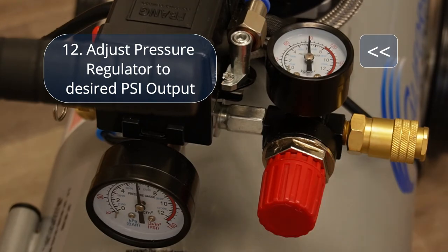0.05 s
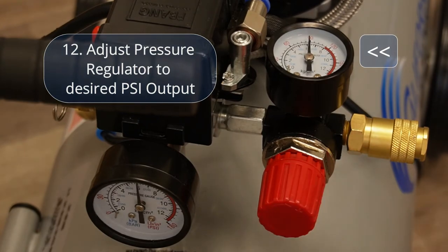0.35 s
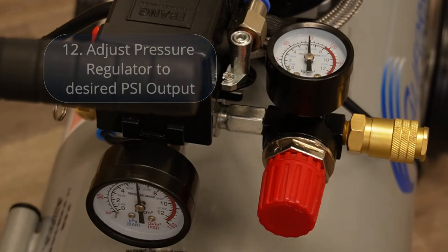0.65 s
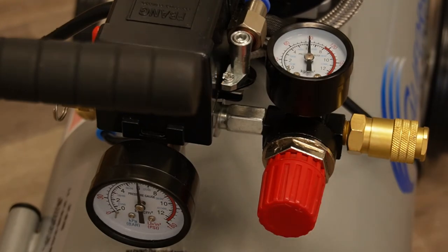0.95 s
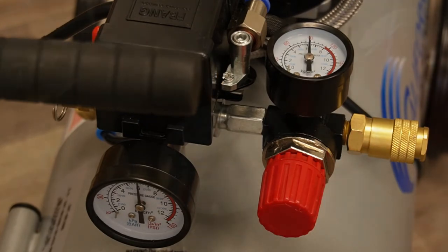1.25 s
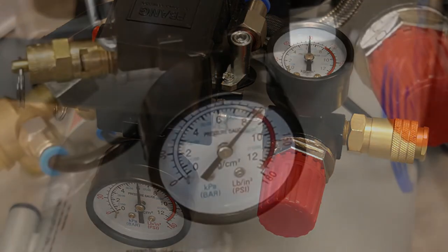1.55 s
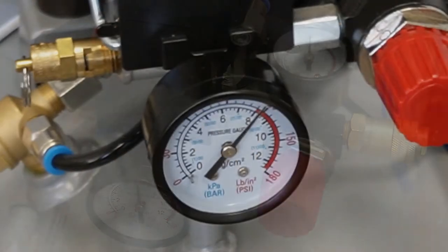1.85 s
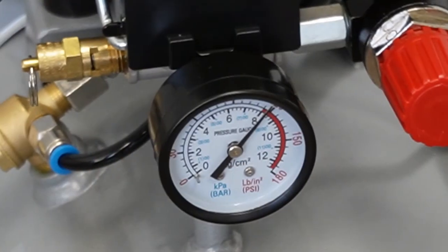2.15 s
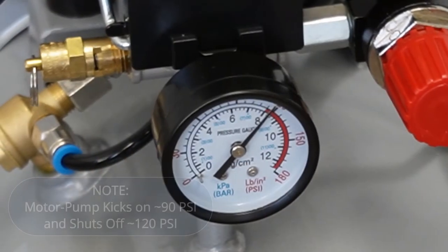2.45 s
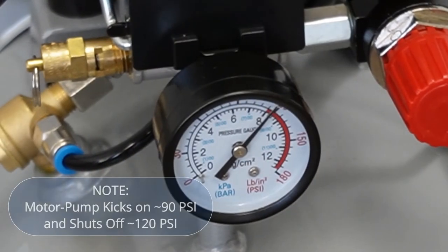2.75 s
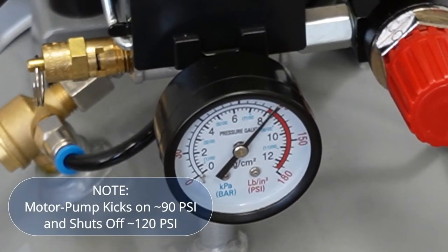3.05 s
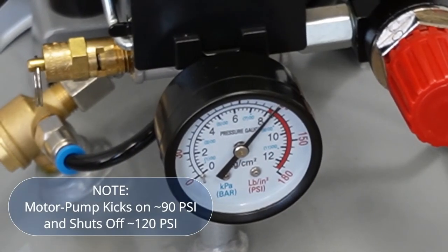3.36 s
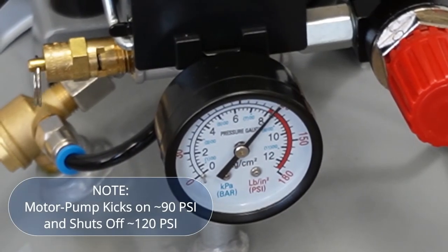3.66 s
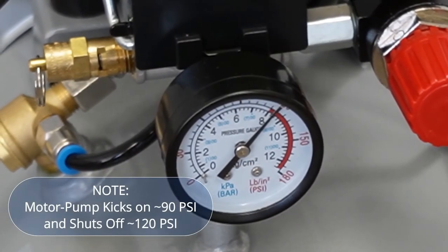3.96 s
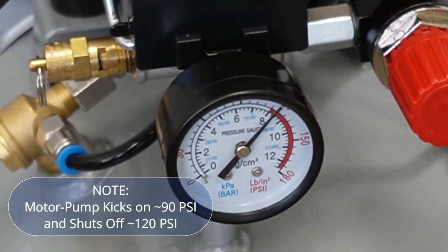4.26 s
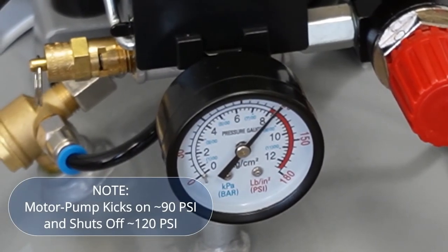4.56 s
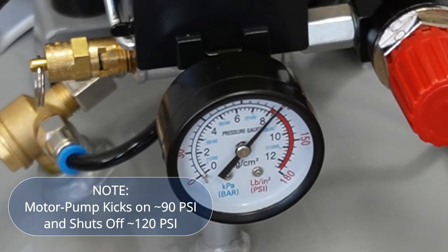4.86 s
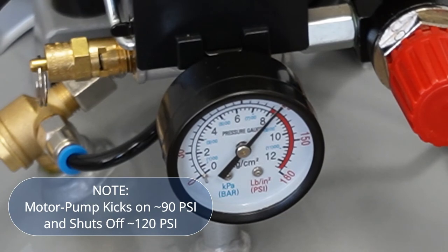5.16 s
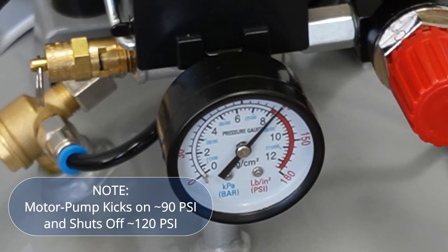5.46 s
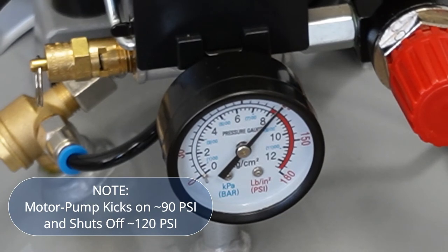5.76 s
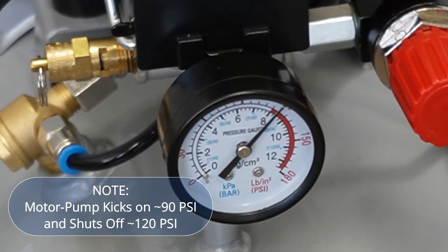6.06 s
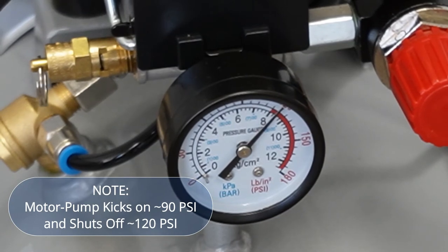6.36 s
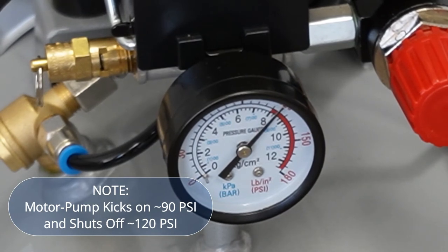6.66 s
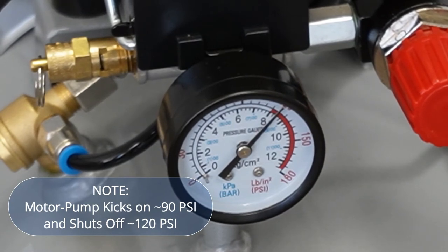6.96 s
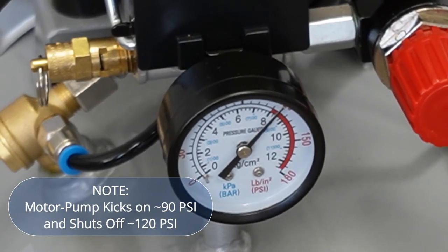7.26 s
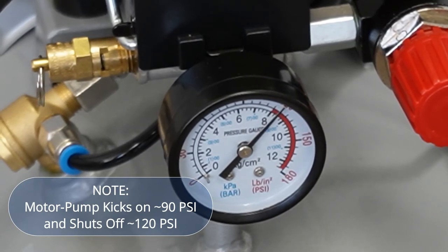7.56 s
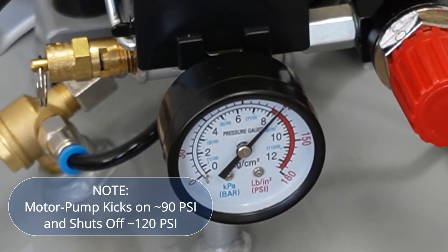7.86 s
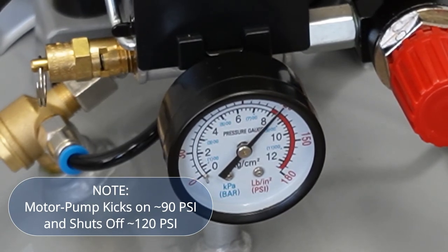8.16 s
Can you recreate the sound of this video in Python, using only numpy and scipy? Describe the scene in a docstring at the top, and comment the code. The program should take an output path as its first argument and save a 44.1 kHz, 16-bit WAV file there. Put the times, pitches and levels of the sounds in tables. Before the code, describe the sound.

A small piston air compressor is already running at the start, heard from close above the pump in a workshop. Fast, even puffs of intake air blend into a fluttering rush over a low hum, with rapid metallic valve ticks and a light rattle. At about 1.6 seconds the sound changes suddenly as the microphone moves beside the gauge: the air noise is softer, and the tank's throbbing, buzzy hum leads, with the ticking still running through it. The speed stays constant. At about 7.4 seconds a switch snaps and the pumping stops abruptly. At the same instant a valve opens with a short spurt, followed by a bright, high, steady hiss of escaping air. The hiss lasts until the end, at about 8 seconds, with only a very faint drone from the coasting motor and quiet room tone beneath it.

```python
"""A small twin-piston air compressor fills its tank in a workshop. The microphone starts close above
the pump: twice a shaft turn the intake draws a puff of air, while reed valves tick and the tank hums.
At 1.6 s the position changes to beside the gauge, where the air is shielded and the hum leads.
At 7.4 s the pressure switch trips, the pumping stops and the unloader valve lets the line's air out
in a bright hiss. Under it the coasting motor leaves a faint drone in the quiet room."""
import sys
import numpy as np
from scipy import signal
from scipy.fft import rfft, irfft, next_fast_len
from scipy.io import wavfile
from scipy.ndimage import map_coordinates

SR = 44100
rng = np.random.default_rng(int(sys.argv[2]) if len(sys.argv) > 2 else 0)


def wav_record(signal):
    """Record a signal, one row per channel, as 16-bit PCM in the file named by sys.argv[1]."""
    frames = np.transpose(np.atleast_2d(signal))
    bounded = np.clip(frames, -1, 1)
    # unit amplitude maps onto the largest positive 16-bit level
    quanta = np.round(bounded * 32767).astype(np.int16)
    wavfile.write(sys.argv[1], SR, quanta)


N = 362392

MOVE_S, TRIP_S = 1.603, 7.3845  # the microphone changes place; the switch trips
ABOVE_SHAFT_HZ, BESIDE_SHAFT_HZ = 28.19, 27.6
FIRST_STROKE_TURNS = .46
CANCEL_BELOW_HZ = 224.9  # below this the two pistons cancel each other's odd harmonics

# Broad response of pump frame and tank. Each row: frequency in Hz, relative level in dB.
ABOVE_TANK = [(55, 2), (170, -3.5), (350, -9), (440, -13), (560, -6.5), (640, -4.5), (690, -13.5),
              (1150, -9), (1220, -24)]
BESIDE_TANK = [(55, -10.5), (440, -14), (560, -14.5), (610, -8.5), (660, -5), (720, -10.5), (850, -14.5),
               (885, -4), (950, 2.5), (995, -3.5), (1020, -16), (1220, -18), (1300, -25), (1500, -20),
               (1600, -24)]
# Narrow resonances (+) and nodes (-). Each row: multiple of the shaft speed, lift in dB.
ABOVE_LIFTS = [(9, 3), (12, 4), (21, 8), (25, 8.5), (31, 12.5), (34, 7), (35, 10), (40, 12)]
BESIDE_LIFTS = [(4, 9), (6, 9), (10, -16), (12, 4), (17, 5), (19, 5), (25, 6), (29, -10), (39, 16), (40, 9),
                (42, 14), (44, 9), (52, 9), (54, 9)]
# Intake and cooling air. Each row: frequency in Hz, level in dB per Hz.
ABOVE_INTAKE = [(25, -100), (80, -100), (130, -82.5), (350, -91), (600, -84), (1050, -93.5), (1300, -90.5),
                (1600, -83.5), (3000, -82.5), (4500, -80.5), (7000, -82.5), (9000, -85), (13000, -84),
                (15800, -89.5)]
BESIDE_INTAKE = [(25, -106), (80, -104), (130, -93), (250, -103), (500, -100), (650, -91.5), (950, -91),
                 (1300, -99), (2400, -96), (4500, -91.5), (6500, -96), (10000, -98.5), (13500, -99),
                 (15800, -103)]
# Modes of cylinder head and housing. Each row: frequency in Hz, width in Hz, peak in dB per Hz.
ABOVE_HEAD_MODES = [(982, 36, -76.5), (1094, 15, -81), (1452, 9, -73), (1570, 40, -81), (1747, 35, -79.5),
                    (3570, 28, -75.5), (3663, 35, -73), (3816, 26, -72.5)]
BESIDE_HEAD_MODES = [(1490, 110, -93), (2040, 90, -93), (2394, 140, -92), (3556, 135, -84.7),
                     (5080, 300, -89.5), (10800, 91, -100)]
# Valve closings. Each row: place in the turn from 0 to 1, relative level in dB, scatter in turns.
ABOVE_SLAPS = [(.44, -0.5, 0.024), (.53, -8, 0.043), (.96, -6, 0.093)]
BESIDE_SLAPS = [(.02, 6, 0.018), (.345, 9, 0.0014), (.455, -4, .0012), (.545, 7, 0.0013), (.845, 8, .004),
                (.885, -14, .004)]
# Ring of the steel reeds. Each row: frequency in Hz, relative level in dB.
ABOVE_REED_RING = [(1500, -30), (4100, -21), (4520, 0), (4780, 0), (5200, -16), (8000, -22), (15800, -27)]
BESIDE_REED_RING = [(1500, -28), (4100, -19), (4550, -6), (4850, -1), (5130, 1), (5550, -16), (15800, -29)]
# Rattle of rods and bearings. Each row: frequency in Hz, level in dB per Hz.
ABOVE_RODS = [(1100, -120), (1500, -88.5), (2600, -87.5), (4200, -101), (7000, -105)]
BESIDE_RODS = [(1100, -120), (1380, -100), (1700, -97), (2050, -93), (2500, -98), (3000, -102),
               (7000, -110)]
# Motor tones from the mains and the rotor slots. Each row: frequency in Hz, level in dB.
ABOVE_MOTOR = [(120, -64.5), (175.5, -70.5), (346, -63), (965.5, -60.5), (1085, -65.5)]
BESIDE_MOTOR = [(120, -76.5), (175.5, -73)]
# Broad rush of the unloader's jet. Each row: frequency in Hz, relative level in dB.
JET_RUSH = [(300, -31), (1400, -20), (2000, -12.5), (2600, -7.5), (3300, -4), (4600, -3), (5600, -10),
            (8000, -8), (15800, -13.5)]
# Modes of the vent tube. Each row: frequency in Hz, width in Hz, relative level in dB.
VENT_MODES = [(8300, 720, -0.5), (10270, 750, -2.5), (12100, 800, -3), (13050, 500, -6), (13950, 600, -1.5),
              (15400, 650, 1.5)]
# Likeness of left and right at the microphone. Each row: frequency in Hz, coherence from 0 to 1.
ABOVE_COHERENCE = [(125, 1), (165, .7), (290, 0.65), (640, 0.66), (1100, 1), (3100, 0.92), (6820, .74),
                   (15000, 0.45)]
BESIDE_COHERENCE = [(60, 1.0), (130, 1.0), (290, 1), (640, 0.97), (1410, 0.96), (3100, 0.91), (6820, 0.72),
                    (15000, 0.52)]
VENT_COHERENCE = [(60, 0.84), (130, 1.0), (290, 0.89), (640, 0.97), (1410, 1), (3100, 1), (6820, 0.71),
                  (15000, 0.74)]
# Drone of the coasting machine. Each row: frequency in Hz, level in dB once it has swelled.
COAST_TONES = [(118.4, -81), (678.3, -82)]
# Room tone of the workshop. Each row: frequency in Hz, level in dB per Hz.
ROOM_TONE = [(25, -114), (60, -110), (120, -110), (330, -116), (500, -110), (680, -104), (900, -107),
             (1200, -107), (4000, -112), (15800, -120)]


def pump_above():
    """Close above the pump: loud intake air, one hard valve tick a turn and a low boom that soon fades."""
    turns = shaft(ABOVE_SHAFT_HZ)
    orders = shaft_orders(ABOVE_SHAFT_HZ, ABOVE_TANK, ABOVE_LIFTS, odd_db=-28, count=44)
    hum = amp(-62.5) * tank_hum(turns, orders, throb_db=4.5, flutter_db=1.1) + motor(ABOVE_MOTOR)
    air = intake(turns, ABOVE_INTAKE, ABOVE_HEAD_MODES, depth_db=1.9, uneven_db=.8, ring_depth_db=1.5)
    ticks = amp(-51.7) * valves(turns, ABOVE_SLAPS, ABOVE_REED_RING, t60=.028, scatter_db=2.8, repeat=.3)
    boom_modes = [(185, 31, -73.5), (423, 30, -75), (646, 7.2, -65.5)]
    boom = filtered(white(), lambda hz: resonances(boom_modes, hz)) * np.interp(clock(), [.2, .4], [1, 0])
    rods = rattle(turns, ABOVE_RODS, depth_db=-1.0)
    return stereo(hum + air + ticks + boom + rods, ABOVE_COHERENCE, left_db=0.9)


def pump_beside():
    """Beside the gauge: the tank's hum leads, and the pumping dies as soon as the load is off."""
    turns = shaft(BESIDE_SHAFT_HZ)
    orders = shaft_orders(BESIDE_SHAFT_HZ, BESIDE_TANK, BESIDE_LIFTS, odd_db=-18, count=57)
    hum = amp(-63) * tank_hum(turns, orders, throb_db=11, flutter_db=0.05) + motor(BESIDE_MOTOR)
    air = intake(turns, BESIDE_INTAKE, BESIDE_HEAD_MODES, depth_db=1.2, uneven_db=.7, ring_depth_db=5)
    ticks = valves(turns, BESIDE_SLAPS, BESIDE_REED_RING, t60=.023, scatter_db=1.6, repeat=1.1)
    rods = rattle(turns, BESIDE_RODS, depth_db=0.5)
    load = np.exp(-since_trip() / 0.018)
    return load * stereo(hum + air + amp(-59.8) * ticks + rods, BESIDE_COHERENCE, left_db=0.3)


def shaft(speed_hz, coast_s=0.48, waver=0.00044):
    """Turns made so far: the speed is nearly constant, then dies away after the switch trips."""
    speed = speed_hz * (1 + waver * wobble(6)) * np.exp(-since_trip() / coast_s)
    return np.cumsum(speed) / SR


def strokes(turns, depth_db):
    """Air flow swells twice a turn, once for each piston."""
    return unit(amp(depth_db * np.cos(4 * np.pi * (turns - FIRST_STROKE_TURNS))))


def shaft_orders(speed_hz, tank, lifts, odd_db, count):
    """Multiple and dB of each shaft harmonic: the tank colours them, low odd ones cancel, some ring."""
    multiple = np.arange(1, count + 1)
    hz = multiple * speed_hz
    cancelled = odd_db * (multiple % 2) * np.maximum(1 - hz / CANCEL_BELOW_HZ, 0)
    lift = sum(db * (multiple == round(k)) for k, db in lifts)
    return np.column_stack([multiple, along(tank, hz) + cancelled + lift])


def tank_hum(turns, orders, throb_db, flutter_db):
    """The frame drones evenly on the low orders; two regions of the tank wall buzz with each stroke."""
    frame, low_wall, high_wall = np.split(orders, [19, 29])
    parts = (frame, 0), (low_wall, throb_db / 2), (high_wall, throb_db)
    hum = sum(harmonics(turns, part, depth_db) for part, depth_db in parts)
    return hum * amp(flutter_db * wobble(25))


def harmonics(turns, orders, throb_db, size=1024, passes=40):
    """Shaft harmonics whose energy is shared evenly between the two strokes."""
    multiple, db = np.transpose(orders)
    strength = np.zeros(size // 2 + 1)
    strength[np.round(multiple).astype(int)] = amp(db) * size / np.sqrt(2)
    cycle = rng.standard_normal((2, size))
    swell = strokes(np.arange(size) / size, throb_db)
    for _ in range(passes):  # shift the phases until the wave swells with the strokes
        phase = np.angle(rfft(np.tanh(2 * swell) * np.sign(cycle)))
        cycle = irfft(strength * np.exp(1j * phase))
    return repeated(cycle * swell ** (1 / 14), turns)


def intake(turns, spectrum, head_modes, depth_db, uneven_db, ring_depth_db):
    """Puffs of turbulent air, no two alike; each stroke also rings the cylinder head."""
    puffs = white() * strokes(turns, depth_db) * unit(amp(uneven_db * wobble(110)))
    ring = filtered(white() * strokes(turns, ring_depth_db), lambda hz: resonances(head_modes, hz))
    return reflected(ring + coloured(puffs, spectrum))


def valves(turns, slaps, reed_ring, t60, scatter_db, repeat):
    """The reeds slap their seats at set places in the turn, a little early or late, hard or soft."""
    blows, turn = np.zeros(N), np.arange(int(turns[-1]))
    for place, db, scatter in slaps:
        late, force = rng.standard_normal(len(turn)), rng.uniform(-1.2, 1, len(turn))
        at = np.minimum(np.searchsorted(turns, turn + place + scatter * late), N - 1)
        blows[at] += amp(db + scatter_db * force)
    decays = signal.lfilter([1], [1, -amp(-60 / (t60 * SR))], blows)
    # part of each slap is the same in every turn, part is new
    chatter = repeat * unit(repeated(rng.standard_normal((2, SR // 28)), turns)) + unit(white())
    return unit(coloured(decays * chatter, reed_ring))


def rattle(turns, spectrum, depth_db):
    """Rods and bearings run over the same roughness in every turn."""
    roughness = unit(repeated(rng.standard_normal((2, 1600)), turns)) * np.sqrt(SR / 2)
    return coloured(roughness * strokes(turns, depth_db), spectrum)


def motor(tones):
    """Steady tones of the motor, each reaching left and right at a random phase."""
    return sum(np.sqrt(2) * amp(db) * np.sin(2 * np.pi * (hz * clock() + rng.random((2, 1))))
               for hz, db in tones)


def unloader(spurt_db=2.0, spurt_s=.009, sputter_db=0.37):
    """The valve opens with a spurt and its tube hisses; the rush eases as noise at the edge grows."""
    def layer(response, db, db_per_s):
        return amp(db + db_per_s * since_trip()) * unit(filtered(white(), response))

    rush = layer(lambda hz: amp(along(JET_RUSH, hz)), db=-47.5, db_per_s=-3)
    edge = layer(lambda hz: resonances([(6400, 3100, 0)], hz) ** 2, db=-50, db_per_s=6.5)
    tube = lambda hz: resonances(VENT_MODES, hz) * hz ** 2 / (hz ** 2 + 4500 ** 2)
    hiss = layer(tube, db=-40, db_per_s=0.4)
    flow = (clock() >= TRIP_S) * amp(spurt_db * np.exp(-since_trip() / spurt_s) + sputter_db * wobble(300))
    return flow * stereo(reflected(rush + edge + hiss), VENT_COHERENCE, left_db=-0.1)


def pressure_switch():
    """The switch snaps over inside its plastic cover; the frame shudders as the drive lets go."""
    def burst(spectrum, db, t60):
        return amp(db - 60 * since_trip() / t60) * unit(coloured(white()[0], spectrum))

    # Each pair: frequency in Hz, relative level in dB.
    cover = [(60, -22), (170, -2), (480, -1), (1300, -17), (3800, 1), (9000, -19), (15800, -28)]
    frame = [(40, -17), (160, -2), (300, -1), (700, 5), (1200, -9), (4000, -26), (15800, -40)]
    return (clock() >= TRIP_S) * (burst(cover, db=-46.5, t60=.06) + burst(frame, db=-60, t60=.45))


def workshop():
    """Quiet room tone; a faint drone swells while the rotor coasts."""
    room = coloured(white()[0], ROOM_TONE)
    swell = np.interp(clock(), [7.75, 8.1], [.25, 1])
    return room + swell * motor(COAST_TONES)[0]


def reflected(pair, echo_db=-23, count=12):
    """Metal faces near the microphone add weak copies, which comb the spectrum lightly."""
    delays_s = rng.uniform(.001, .012, count)
    return pair + amp(echo_db) * sum(np.roll(pair, int(delay * SR), axis=1) for delay in delays_s)


def stereo(pair, coherence, left_db):
    """The first signal reaches both channels alike; the second is the diffuse part that parts them."""
    likeness = lambda hz: np.clip(along(coherence, hz), 0, .9995)
    side = filtered(pair[1], lambda hz: np.tan(np.arccos(likeness(hz)) / 2))
    return np.array([pair[0] + side, pair[0] - side]) * amp([[left_db / 2], [-left_db / 2]])


def repeated(cycle, turns):
    """One turn's pair of waveforms, played round and round."""
    place = np.linspace(0, 1, cycle.shape[1] + 1)
    return np.array([np.interp(turns % 1, place, np.append(wave, wave[0])) for wave in cycle])


def resonances(modes, hz):
    """Gain of a set of modes. Each row: frequency in Hz, width in Hz, peak in dB."""
    return np.sqrt(sum((amp(db) * hz * width) ** 2 / ((centre ** 2 - hz ** 2) ** 2 + (hz * width) ** 2)
                       for centre, width, db in modes))


def filtered(x, response):
    """x through a gain that depends on frequency."""
    size = next_fast_len(N + 4096, real=True)
    return irfft(rfft(x, size) * response(np.fft.rfftfreq(size, 1 / SR)), size)[..., :N]


def coloured(x, spectrum):
    """x through a curve of dB against Hz."""
    return filtered(x, lambda hz: amp(along(spectrum, hz)))


def along(points, hz):
    """A table's value at hz, on a log frequency axis."""
    knots_hz, values = np.transpose(points)
    return np.interp(np.log(hz + 1), np.log(knots_hz + 1), values)


def wobble(rate):
    """A smooth random curve, rate knots a second."""
    at = np.arange(0, N / SR * rate + 1, 1 / 10)
    knots = rng.standard_normal(int(at[-1]) + 4)
    return np.interp(clock() * rate, at, map_coordinates(knots, [at]))


def white():
    """Two unrelated noises of 0 dB per Hz."""
    return rng.standard_normal((2, N)) * np.sqrt(SR / 2)


def amp(db):
    """Decibels to gain."""
    return 10 ** (np.asarray(db) / 20)


def unit(x):
    """Scaled to rms 1."""
    return x / np.sqrt(np.mean(x ** 2) + 1e-20)


def clock():
    """Every sample's time in seconds."""
    return np.arange(N) / SR


def since_trip():
    """Seconds since the switch tripped, 0 until then."""
    return np.maximum(clock() - TRIP_S, 0)


def scene():
    """Above the pump, then at once beside the gauge, where the switch trips and the line vents."""
    pump = np.where(clock() < MOVE_S, pump_above(), pump_beside())
    return pump + pressure_switch() + unloader() + workshop()


def record(dry, top_hz=15790):
    """The microphone keeps nothing above its band limit."""
    return filtered(dry, lambda hz: hz < top_hz)


dry = scene()
out = record(dry)
wav_record(out)
```